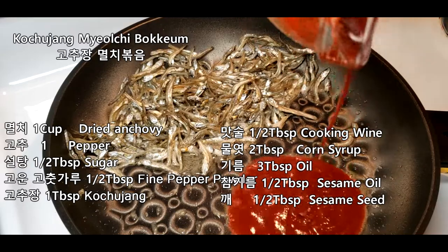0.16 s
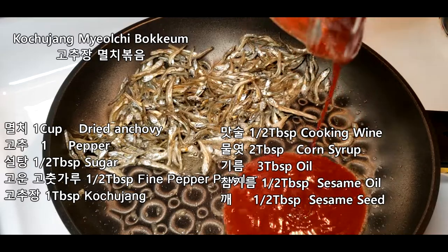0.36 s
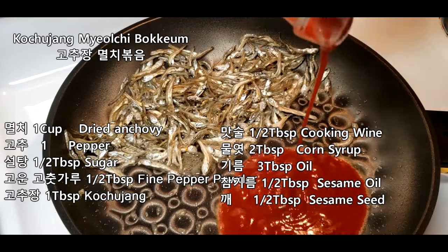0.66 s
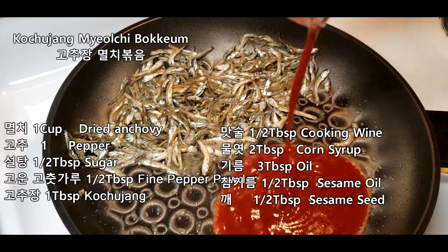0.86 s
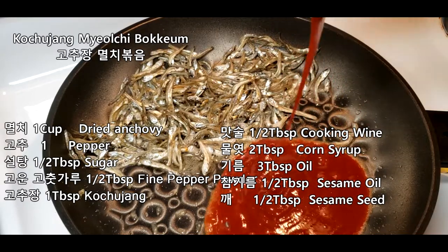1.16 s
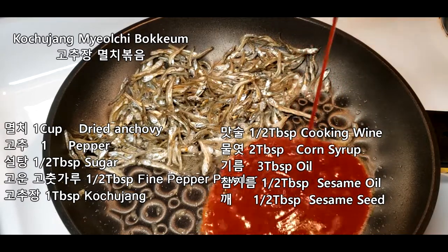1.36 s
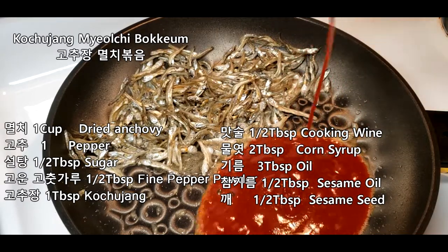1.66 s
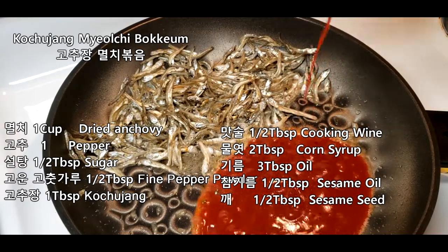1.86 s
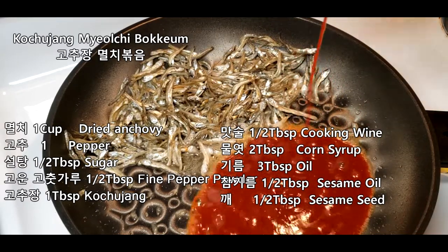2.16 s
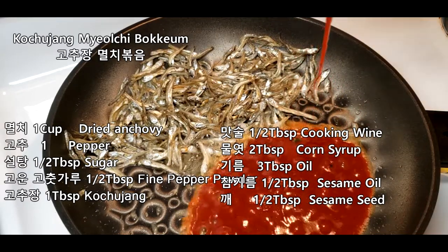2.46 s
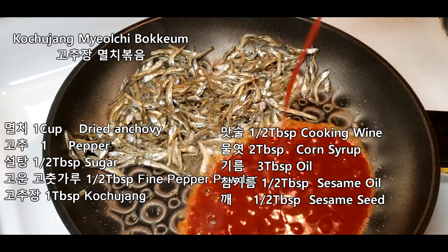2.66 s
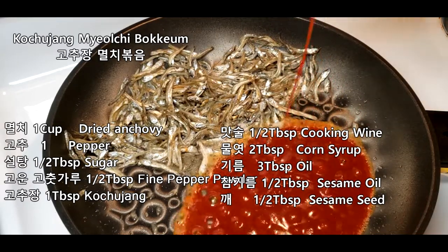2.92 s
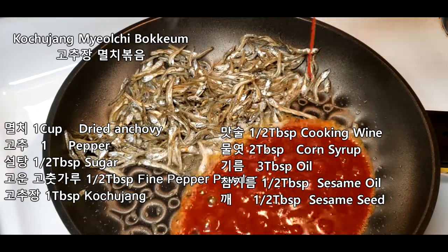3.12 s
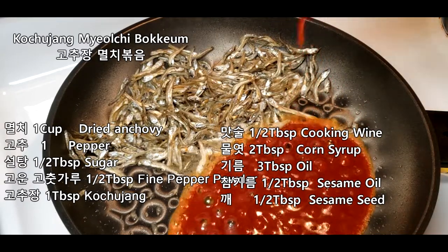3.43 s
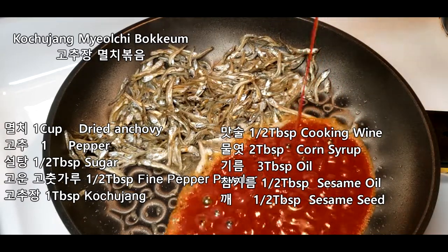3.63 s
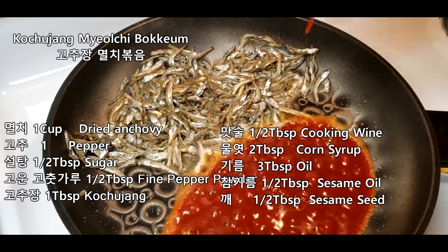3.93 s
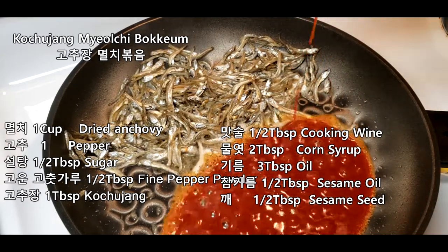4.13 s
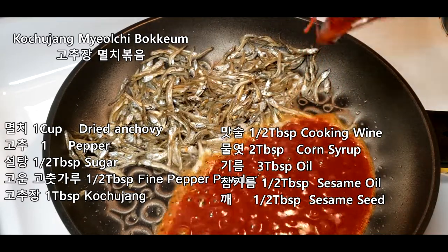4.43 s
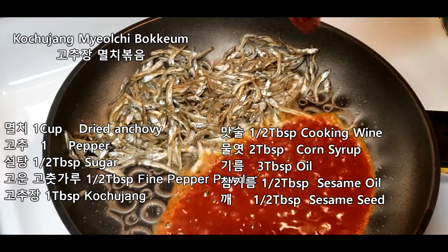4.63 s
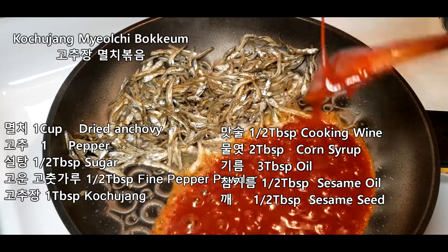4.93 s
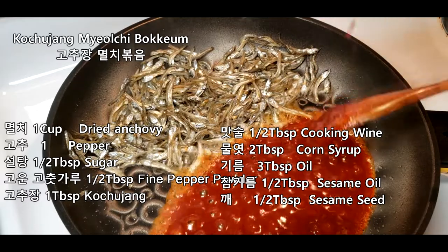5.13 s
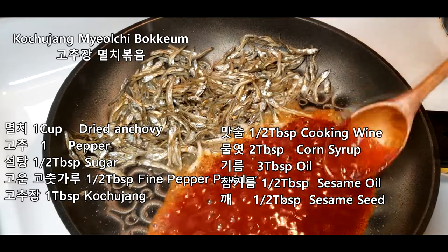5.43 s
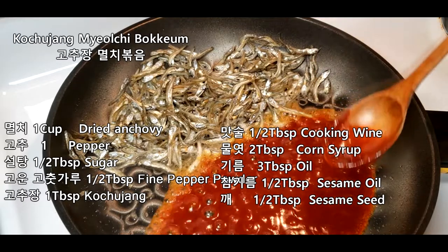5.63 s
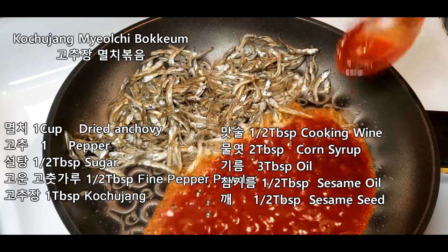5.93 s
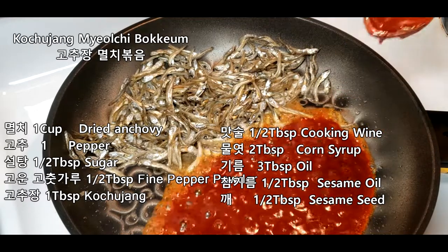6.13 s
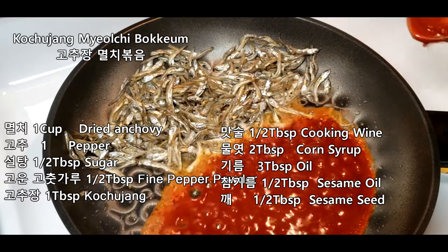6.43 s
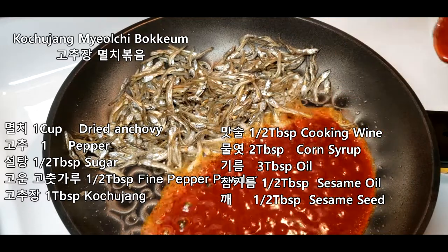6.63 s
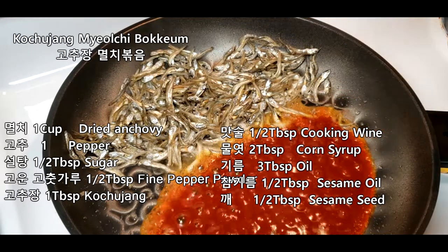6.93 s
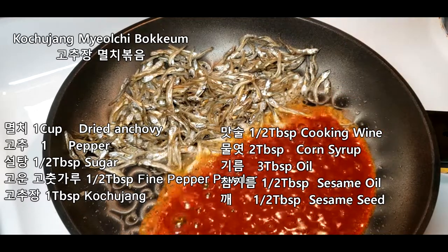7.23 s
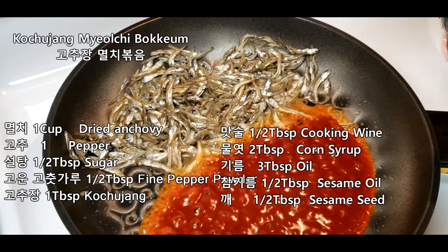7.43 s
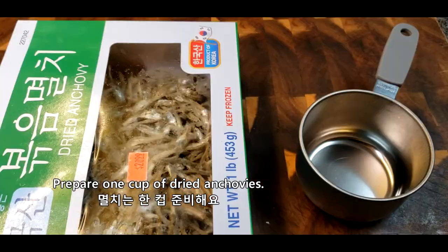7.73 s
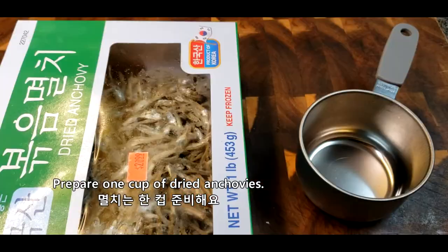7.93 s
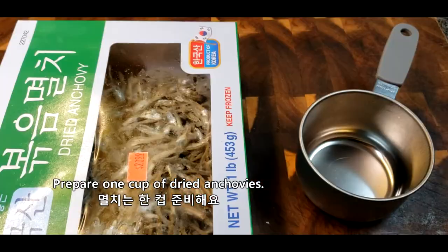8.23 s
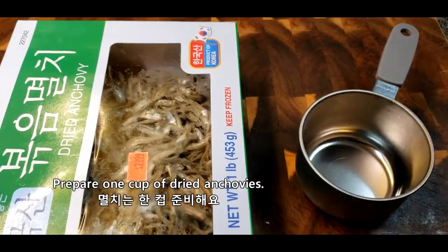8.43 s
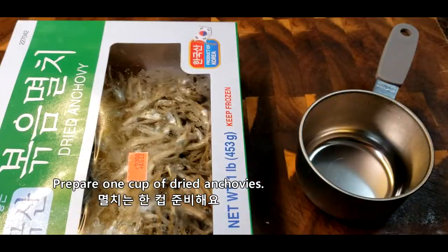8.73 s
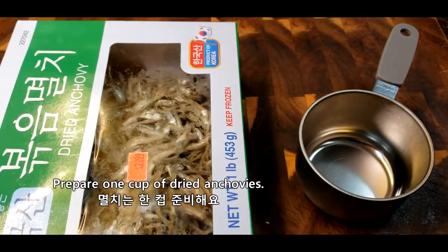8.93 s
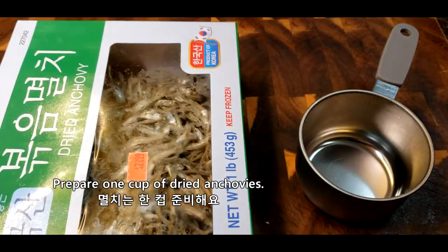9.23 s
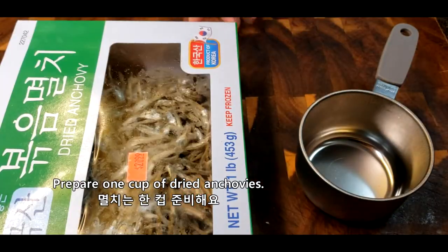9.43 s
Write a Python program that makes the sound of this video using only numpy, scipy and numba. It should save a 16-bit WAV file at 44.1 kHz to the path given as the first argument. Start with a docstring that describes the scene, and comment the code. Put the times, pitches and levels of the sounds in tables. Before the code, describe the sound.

A pan of sauce and oil fizzes vigorously right by the microphone, spitting fine crackles and louder snappy pops, slightly toward the left. It grows a little fuller over a faint low drone. A spoon is set down with a short dry chatter, followed by soft thuds. Then a hard edit drops to indoor quiet: mains hum, low rumble and barely audible brushes of cloth or hand.

```python
"""Sauce boils in a hot pan close by: large bubbles simmer, small ones fizz and spit, single ones pop.
The bubbling is coloured noise plus many short ringing bursts. A wooden spoon is laid on a dish, as fading tones.
The stove adds rumble, a low drone and mains hum. A cut leads to the quiet kitchen: hum, rumble, a faint hiss
and brushing rustles made of swelling noise."""
import sys
import numpy as np
from scipy import signal
from scipy.fft import rfft, irfft, next_fast_len
from scipy.io import wavfile
from scipy.ndimage import uniform_filter1d
from numba import njit

SR = 44100
rng = np.random.default_rng(int(sys.argv[2]) if len(sys.argv) > 2 else 0)


def put_to_file(sound):
    """Save the sound as 16-bit audio at rate SR, in the file named by the first command-line argument."""
    columns = np.atleast_2d(sound).T  # one column per channel
    safe = np.clip(columns, -1, 1)
    whole_steps = np.round(safe * 32767)
    wavfile.write(sys.argv[1], SR, whole_steps.astype(np.int16))


N = 422037
T = np.arange(N) / SR  # time of every sample, s
SIZE = next_fast_len(N)
LOG_HZ = np.log(np.arange(1, SIZE // 2 + 2) * SR / SIZE)  # log pitch of every bin of the spectrum

# The cut: when the stove is gone and how long its fade takes; then the trace of sizzle
CUT_S, FADE_S = 7.692, .022
AFTER_DB, AFTER_S = -29, 0.025

# Quiet kitchen rumble, and the hiss above it: [pitch_hz, relative_level_db_per_hz]
ROOM_COLOUR = [(15, -35), (25, -25), (50, -1), (90, 3.5), (110, -3), (145, 4), (170, -12), (230, -5),
               (270, -18), (400, -18.5), (600, -26), (900, -46)]
AIR_COLOUR = [(410, -30), (700, -10), (830, -4.5), (1170, -3.5), (1350, -9), (1460, -4.5), (1710, -9.5),
              (6650, -20.5), (8210, -27.5), (12300, -16), (16000, -14)]
ROOM_DB, AIR_DB = -52, -79
# Likeness of left and right in the kitchen: [pitch_hz, likeness_0_to_1]
ROOM_LIKE = [(60, 0.97), (130, 0.86), (290, 0.85), (640, 0.3), (1410, 0.01), (3100, 0), (6820, -0.02),
             (15000, 0.06)]
# Sideways lean of the kitchen: [pitch_hz, left_minus_right_db]
ROOM_LEAN = [(60, 3), (110, -6), (200, 5.5), (380, 1.5), (700, 4), (1290, 0), (2380, 2), (4400, 3.5),
             (8120, 4), (15000, 2)]
HUM_HZ, HUM_STOVE_DB, HUM_ROOM_DB = 120, -51.5, -46

# Brushing strokes: [loudest_s, level_db, rise_s, fall_s]
RUSTLE_STROKES = [(8.51, -83, .02, 0.059), (8.645, -64.5, 0.027, 0.04), (8.77, -75.5, .02, 0.033),
                  (8.835, -69.5, 0.058, 0.057), (9.33, -71, 0.0077, 0.042)]
# One colour for each stroke: [pitch_hz, relative_level_db_per_hz]
RUSTLE_COLOURS = [
    [(3000, -28.5), (4700, 0.5), (7000, -3), (8500, -31)],
    [(410, -38), (700, -6), (863, -7), (946, -32), (1010, -5), (1300, -3.5), (2560, -12.5), (7290, -11),
     (8420, -23), (16000, -13)],
    [(4500, -30), (6300, -0.5), (7500, -10.5), (9000, -33.5)],
    [(710, -45), (1200, -15), (1640, -3.5), (2860, -4), (3830, -8), (6650, -3), (8720, -16), (12000, -7),
     (16000, -12)],
    [(410, -63.5), (700, -35.5), (946, -2), (1520, -6), (1840, -25), (2020, -10), (3110, -21), (3940, -9),
     (5060, -23.5), (8210, -33), (9600, -14), (11000, -22), (13100, -21), (16000, -37.5)],
]

# Rumble at the stove: [pitch_hz, relative_level_db_per_hz]
STOVE_COLOUR = [(15, -27), (25, -10.5), (45, -8), (80, 2), (108, -4), (140, -2), (165, -5), (195, -11.5),
                (222, -11.5), (300, -14.5), (400, -49)]
STOVE_DB = -51.5
# Loudness of the low drone at the stove: [time_s, level_db]
DRONE_LEVELS = [(0, -51.5), (1.2, -53.5), (2.0, -55), (3.4, -53.5), (4.6, -49), (5.2, -53.5), (5.7, -46),
                (6.5, -48), (7.6, -54.5)]
# Narrow colour of the drone: [pitch_hz, relative_level_db_per_hz]
DRONE_COLOUR = [(45, -29.5), (57, -13.5), (63, 2), (67, 2), (73, -7.5), (90, -30.5)]

# Contacts of the spoon with the dish: [start_s, strength_db, contact_softness_ms]
SPOON_TAPS = [(6.938, -24, .1), (6.941, -20, .1), (6.950, -30, .1), (6.963, -29.5, .03), (6.980, -33, .7),
              (6.997, -38, .05), (7.006, -27.5, .1), (7.012, -29.5, .12), (7.020, -33, .15),
              (7.044, -33.5, .5)]
# Tones of the dish: [pitch_hz, relative_level_db, time_to_fade_60_db_s]
DISH_TONES = [(1110, -13.5, 0.046), (1381, -10.5, .07), (1445, 0, 0.078), (2050, -20, .03),
              (3008, -2.5, 0.04), (3120, -10, .05), (3587, -3, 0.04), (3680, -1, 0.044), (5080, -4, 0.035),
              (5205, -8, 0.034), (5880, -5.5, 0.018), (7060, -4, .03), (8000, -5, .03)]
# Dull knocks on the counter: [start_s, strength_db]
COUNTER_KNOCKS = [(6.939, -40.5), (7.201, -40.5), (7.221, -47)]
# Tones of the counter: [pitch_hz, relative_level_db, time_to_fade_60_db_s]
COUNTER_TONES = [(203.4, -8, 0.23), (423, -6, 0.15), (486.5, 3, .15), (720, -4, .15)]

# Likeness of left and right at the pan: [pitch_hz, likeness_0_to_1]
PAN_LIKE = [(60, 0.99), (130, 1), (290, 0.9), (640, 0.7), (1410, 0.6), (3100, 0.1), (6820, 0), (15000, 0)]
# Sideways lean of the pan: [pitch_hz, left_minus_right_db]
PAN_LEAN = [(60, 2.0), (110, 2.5), (200, 2), (380, 2.5), (700, 3.5), (1290, 1.5), (2380, 4.5), (4400, 4),
            (8120, 5.5), (15000, 12)]
# How far left runs ahead of right in the bubbling: [pitch_hz, lead_radians]
PAN_LEAD = [(200, 0.084), (600, 0.29), (860, -.8), (1380, -1.1), (1720, 0.48), (2900, 1)]
# Narrow bands lifted or lowered by pan and stove: [pitch_hz, width_hz, change_db]
PAN_BANDS = [(332, 18, 3), (472.4, 33, 3), (612, 16, 0), (923, 6.7, 5), (1149, 9.6, 6.5), (1314, 12, 5),
             (1450, 17, 1.5), (1647, 21, -6)]

# Gains of the three bubble sizes: [time_s, simmer_db, fizz_db, spit_db]
BOIL_LEVELS = [(0, -45.5, -43.5, -44), (.5, -46, -44.5, -44), (1.0, -45, -42.5, -42),
               (1.6, -45.5, -42.5, -42), (2.4, -45, -40.5, -41.5), (3.3, -45.5, -41.5, -43),
               (3.9, -44.5, -40, -41.5), (5.2, -44, -39.5, -41), (5.7, -43, -39.5, -43),
               (6.2, -44, -40.5, -41.5), (6.9, -43.5, -40, -41.5), (7.35, -44.5, -41, -41.5),
               (7.47, -46, -42.5, -43.5), (7.62, -45.5, -41.5, -43)]
# Colours of large, small and smallest bubbles: [pitch_hz, relative_level_db_per_hz]
SIMMER_COLOUR = [(150, -44.5), (250, -22), (283, -12.5), (361, -6.5), (472, -5.5), (584, -6), (687, 0),
                 (779, -3.5), (936, -0.5), (991, -2.5), (1170, -1), (1600, 0), (1750, 3.5), (2250, -4),
                 (2500, -3.5), (3250, -28), (5500, -120)]
FIZZ_COLOUR = [(1350, -38), (2300, -9.5), (2910, 3), (3290, 0), (4390, -1), (5520, 2), (6350, -2.5),
               (7480, 1), (8800, -13), (11400, -38), (19400, -120)]
SPIT_COLOUR = [(4880, -39.5), (8300, -12.5), (8890, -8.5), (10100, -4), (12300, -2), (13600, -3),
               (15100, -0.5), (16000, -6)]
# The middle of the simmer grows as the sauce heats; at SWELL_EVEN_S it is unchanged
SWELL_HZ, SWELL_WIDTH_HZ, SWELL_DB_PER_S, SWELL_EVEN_S = 1400, 900, 0.43, 3.5
# Short flurries of small bubbles: [loudest_s, fizz_lift_db, spit_lift_db]
FLURRIES = [(.66, -0.5, 0), (.89, -1, 0.5), (1.15, 2.5, 5), (1.29, 1.5, 2), (1.43, 1, 2.5), (1.91, 0, 0),
            (2.6, 1, -2), (3.42, 1.5, 1), (4.43, 2.5, 0), (5.9, 1, 2)]
FLURRY_S = 0.028
# Loud pops, before echo and small side shifts: [start_s, peak_db, pitch_hz, treble_over_note_db, left_minus_right_db]
POPS = [(0.1211, -19, 3060, 16, 2), (0.178, -14.5, 3060, 17, 7), (0.6784, -22, 7390, 14, 4),
        (0.8315, -19.5, 4300, -5, 1), (1.053, -20, 5000, 2, 4), (1.1145, -30, 5320, -2, 6),
        (1.278, -26.5, 6200, -4, 7), (1.3084, -20.5, 5240, 6.5, 6), (1.386, -14.5, 5400, 11, 6),
        (1.4536, -24, 4200, 5, 2), (1.9174, -25, 6390, 5, 7.5), (2.1187, -28, 3010, -7, 5),
        (2.184, -21, 7780, 18, 9.5), (2.1994, -12, 5090, 20, 6), (2.2545, -21.5, 3940, -9, 7),
        (2.302, -11.5, 6400, 5, 0.5), (2.4555, -23, 3920, -4, 4), (2.5778, -12, 5300, 13, 4),
        (2.5984, -27, 3150, 2, 1.5), (3.122, -19, 3030, -13, 6), (3.3074, -20, 6040, 2, 5),
        (3.486, -13.5, 6000, -14, 6.5), (3.8292, -22.5, 5260, 9.5, 15), (3.853, -18, 6050, -5, 5.5),
        (3.8559, -11, 6200, -6.5, 7), (3.8724, -24, 5670, -2.5, 6), (4.354, -18, 5570, -10.5, 6),
        (4.368, -21, 7160, -7, 10), (4.806, -25, 5130, -3, 10), (5.0597, -24, 5650, 0, 6.5),
        (5.6504, -30, 3490, -7, 6.5), (5.678, -26, 2910, 5, 7), (5.907, -22, 3800, -4, -1),
        (6.516, -21.5, 5600, -6, 3), (6.6104, -25, 5610, 8, 7.5), (6.635, -25.5, 2780, 2.5, 7),
        (6.8201, -17.5, 3140, 16.5, 9), (7.277, -26, 3430, 6, 6.5), (7.293, -18, 5600, 7, 6),
        (7.4964, -26, 5550, -5, 8)]
SPRAY_DB = -37  # every pop throws about the same spray
NOTE_SHARE, TREBLE_SHARE, TREBLE_HZ = .3, .4, 14000  # shares: bandwidth divided by pitch

# Edges of the two steep treble cuts
TREBLE_EDGE_HZ, LAST_EDGE_HZ = 15800, 16807


def undb(db):
    """Turn decibels into a plain gain."""
    return 10 ** (np.asarray(db) / 20)


def level(x, db):
    """Set the average loudness (rms) of left and right mixed together."""
    middle = x.mean(axis=0)
    return x * undb(db) / np.sqrt(np.mean(middle ** 2))


def over_hz(table, outside=None):
    """Read a table of pitch and value at every bin of the spectrum."""
    hz, value = np.transpose(table)
    return np.interp(LOG_HZ, np.log(hz), value, outside, outside)


def colour(bins, spectrum, lean, db=0):
    """Shape a stereo spectrum, lean it to one side and turn it into sound."""
    side_db = np.array([[.5], [-.5]]) * over_hz(lean)
    shaped = bins * undb(over_hz(spectrum, -120) + side_db)
    return level(irfft(shaped, SIZE)[:, :N], db)


def pair(like, lead=((20, 0), (200, 0))):
    """White noise bins whose left and right are alike by the table."""
    left, other = rng.standard_normal((2, len(LOG_HZ))) + 1j * rng.standard_normal((2, len(LOG_HZ)))
    likeness = np.clip(over_hz(like), 0, 1)
    shared = likeness * left * np.exp(-1j * over_hz(lead))
    return np.array([left, shared + np.sqrt(1 - likeness ** 2) * other])


def walk(rate):
    """Random levels, one every 1 / rate s, smoothed twice; spread near 1."""
    hold = int(SR / rate)
    steps = np.repeat(rng.standard_normal(N // hold + 1), hold)
    return 2.1 * uniform_filter1d(uniform_filter1d(steps, hold), hold)[:N]


def hum(db, pan_db):
    """Mains hum: a steady tone at twice the mains frequency."""
    tone = np.sqrt(2) * np.sin(2 * np.pi * HUM_HZ * T)
    return tone * undb(db + pan_db * np.array([[.5], [-.5]]))


def room():
    """The quiet kitchen: noise shaped into rumble and a faint hiss, with the hum."""
    rumble = colour(pair(ROOM_LIKE), ROOM_COLOUR, ROOM_LEAN, ROOM_DB)
    hiss = colour(pair(ROOM_LIKE), AIR_COLOUR, ROOM_LEAN, AIR_DB)
    return rumble + hiss + hum(HUM_ROOM_DB, pan_db=4.5)


def rustles():
    """Faint brushing of cloth or hand: each stroke is noise that swells and dies away."""
    out = 0
    for (s, db, rise_s, fall_s), spectrum in zip(RUSTLE_STROKES, RUSTLE_COLOURS):
        slope_s = np.where(T < s, rise_s, fall_s)
        swell = 1 / np.cosh(np.clip((T - s) / slope_s, -30, 30))
        out = out + swell * colour(pair(ROOM_LIKE), spectrum, ROOM_LEAN, db)
    return out


def stove():
    """Near the burner: noise as rumble, noise in one narrow low band as a drone, and the hum."""
    s, db = np.transpose(DRONE_LEVELS)
    drone = colour(pair(PAN_LIKE), DRONE_COLOUR, PAN_LEAN) * undb(np.interp(T, s, db))
    rumble = colour(pair(PAN_LIKE), STOVE_COLOUR, PAN_LEAN, STOVE_DB)
    return drone + rumble + hum(HUM_STOVE_DB, pan_db=3.5)


def strike(out, s, force, tones, detune=0.005):
    """One blow rings fading tones, slightly off pitch and a little out of step between left and right."""
    hz, db, t60 = np.transpose(tones)[:, :, None]
    shift, lag = rng.standard_normal((2, len(tones), 1))
    t = T[:SR // 4]
    fade = undb(db) * 1000 ** (-t / t60)
    turn = 2 * np.pi * hz * (1 + detune * shift)
    # only the right side is shifted in time
    body = [np.sum(fade * np.sin(turn * (t + delay_s * lag)), axis=0) for delay_s in (0, 0.00019)]
    out[:, int(s * SR):][:, :len(t)] += signal.lfilter(force, [1], body)


def spoon():
    """The spoon chatters on the dish and thuds into the counter; short pushes ring their tones."""
    clack, thud = np.zeros((2, 2, N))
    for s, db, soft_ms in SPOON_TAPS:
        push = np.hanning(int(np.clip(soft_ms, .02, 2) * SR / 1000) + 3)
        # the edge grates for a few ms after it lands
        grate = undb(-17) * np.exp(-T[:600] / 0.004) * rng.standard_normal(600)
        grate[0] = 1
        force = undb(db) * np.convolve(push / push.sum(), grate)
        strike(clack, s, force, DISH_TONES)
        # the contact itself is heard too
        clack[:, int(s * SR):][:, :len(force)] += undb(20) * force
    for s, db in COUNTER_KNOCKS:
        strike(thud, s, undb([db]), COUNTER_TONES)
    # a small dish radiates no bass
    band = signal.butter(N=3, Wn=[850, 11500], btype="band", fs=SR, output="sos")
    return (signal.sosfilt(band, clack) + thud) * undb([[1.5], [-1.5]])


@njit
def bursts(start, hz, width, gain, spray, noise, rise, snap, tail):
    """Each burst is a snap and a weaker spray of noise through a steep resonance of its own."""
    out, one = np.zeros(noise.shape), np.zeros(1300)
    for k in range(len(start)):
        pole = np.exp((2j * np.pi * hz[k] - np.pi * width[k]) / SR)
        for c in range(2):
            first, second = 0j, 0j  # the resonance is applied twice
            unrisen, snap_now, spray_now = 1., 1., spray[k]
            top, n = 1e-9, 0
            while n < 1300 and snap_now + spray_now > .01 and start[k] + n < noise.shape[1]:
                push = noise[c, start[k] + n] * (snap_now + spray_now) * (1 - unrisen) ** 2
                first = first * pole + push
                second = second * pole + first
                one[n] = second.real
                top = max(top, abs(second.real))
                unrisen *= rise
                snap_now *= snap
                spray_now *= tail
                n += 1
            # scale the burst so its peak is the wanted gain
            for i in range(n):
                out[c, start[k] + i] += gain[c, k] / top * one[i]
    return out


def pop(s, db, hz, share, spray_db, pan_db, rise_ms=0.26, snap_ms=0.84, tail_ms=8., echo_ms=3.3, echo_db=-11):
    """Bubbles burst; the wall of the pan sends each back once."""
    gain = undb([db + pan_db / 2, db - pan_db / 2])
    rise, snap, tail = np.exp(-1000 / SR / np.array([rise_ms, snap_ms, tail_ms]))
    start = (s * SR).astype(int)
    width = np.clip(share, .02, 1) * hz
    noise = rng.standard_normal((2, N))
    direct = bursts(start, hz, width, gain, undb(spray_db), noise, rise, snap, tail)
    return direct + undb(echo_db) * np.roll(direct, int(echo_ms * SR / 1000), axis=1)


def bubbles(spectrum, lo_hz, hi_hz, count, scatter_db, crackle_db, flicker_db):
    """A seething noise bed of countless bubbles; larger ones crackle or ring briefly on top."""
    when, pitch, size, place, purity = rng.random((count, 5)).T
    size_db = -scatter_db * np.log(1 - .99 * size)  # a few bubbles are much louder
    hz = lo_hz + pitch * (hi_hz - lo_hz)
    share = .5 * .1 ** purity  # purer bubbles ring in a narrower band
    crackle = pop(when * CUT_S, size_db, hz, share, -26 + 14 * purity, 6 * (place - .5))
    bed = colour(pair(PAN_LIKE, PAN_LEAD), spectrum, PAN_LEAN) * undb(flicker_db * walk(30))
    return bed + colour(rfft(crackle, SIZE), spectrum, PAN_LEAN, crackle_db)


def pan_body(x):
    """The pan and the stove resonate, which changes narrow bands of the simmer, mostly lifting them."""
    for hz, width, db in PAN_BANDS:
        x = x + (undb(db) - 1) * signal.lfilter(*signal.iirpeak(hz, hz / width, SR), x)
    return x


def heating(x):
    """As the sauce heats, one broad band of the simmer starts weak and grows steadily."""
    band = signal.lfilter(*signal.iirpeak(SWELL_HZ, SWELL_HZ / SWELL_WIDTH_HZ, SR), x)
    growth = undb(SWELL_DB_PER_S * (T - SWELL_EVEN_S))
    return x + (growth - 1) * band


def loud_pops():
    """Each pop is a lower band and a treble band of the same burst; the stronger sets the peak."""
    s, db, hz, treble_over_note_db, pan_db = np.transpose(POPS)
    spray_db = SPRAY_DB - db  # relative to the pop
    note_db = db - np.maximum(treble_over_note_db, 0)
    treble_db = db + np.minimum(treble_over_note_db, 0)
    note = pop(s, note_db, hz, NOTE_SHARE, spray_db, pan_db - 2.5)
    treble = pop(s, treble_db, np.full(len(s), TREBLE_HZ), TREBLE_SHARE, spray_db, pan_db + 0.5)
    return note + treble


def boil():
    """The boiling sauce: three bubble sizes, flurries of the small ones and loud single pops."""
    s, *columns = np.transpose(BOIL_LEVELS)
    simmer_db, fizz_db, spit_db = (np.interp(T, s, c) for c in columns)
    at, *lifts_db = np.transpose(FLURRIES)
    flurry = np.exp(-((T - at[:, None]) / FLURRY_S) ** 2)
    fizz_lift, spit_lift = np.array(lifts_db) @ flurry
    large = bubbles(SIMMER_COLOUR, 500, 2500, count=1500, scatter_db=2.5, crackle_db=-12, flicker_db=0.44)
    simmer = undb(simmer_db) * heating(pan_body(large))
    small = bubbles(FIZZ_COLOUR, 2500, 8500, count=4000, scatter_db=2.5, crackle_db=-10, flicker_db=.5)
    fizz = undb(fizz_db + fizz_lift) * small
    smallest = bubbles(SPIT_COLOUR, 8500, 15500, count=4000, scatter_db=3., crackle_db=-7, flicker_db=0.77)
    spit = undb(spit_db + spit_lift) * smallest
    return simmer + fizz + spit + loud_pops()


def scene():
    """The boiling pan with the spoon, then a quick cut to the quiet kitchen."""
    before = np.clip((CUT_S - T) / FADE_S, 0, 1)
    # a trace of the sizzle lingers just past the cut
    trace = undb(AFTER_DB) * np.exp(np.minimum(CUT_S - T, 0) / AFTER_S)
    linger = np.maximum(before, trace)
    quiet = (1 - before) * (room() + rustles())
    return quiet + before * (stove() + spoon()) + linger * boil()


def record(dry):
    """Two steep filters drop the top of the treble; above the last edge almost nothing is left."""
    softened = signal.sosfilt(signal.ellip(8, .3, 26, TREBLE_EDGE_HZ, fs=SR, output="sos"), dry)
    return signal.sosfilt(signal.ellip(10, .2, 60, LAST_EDGE_HZ, fs=SR, output="sos"), softened)


dry = scene()
out = record(dry)
put_to_file(out)
```